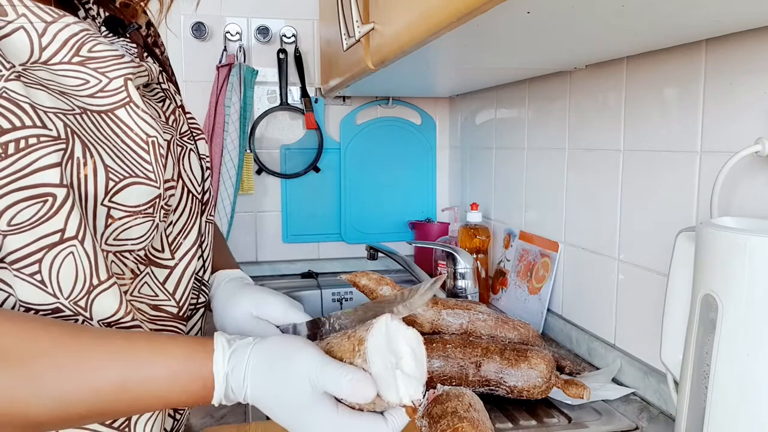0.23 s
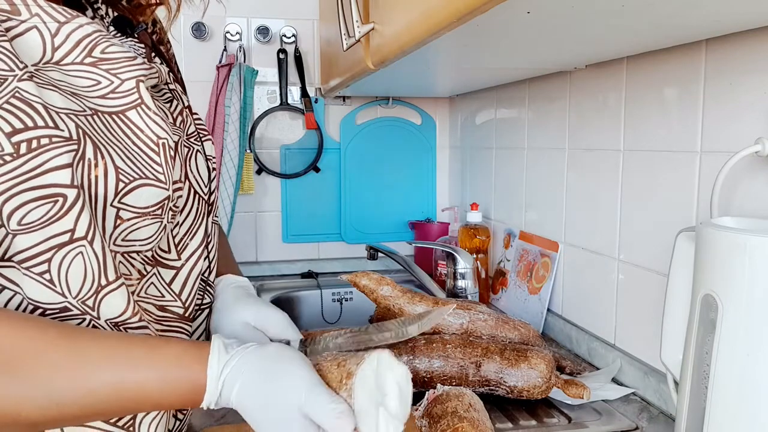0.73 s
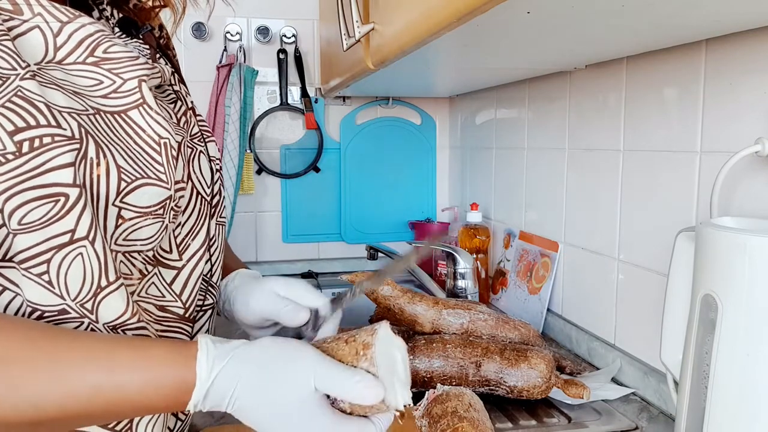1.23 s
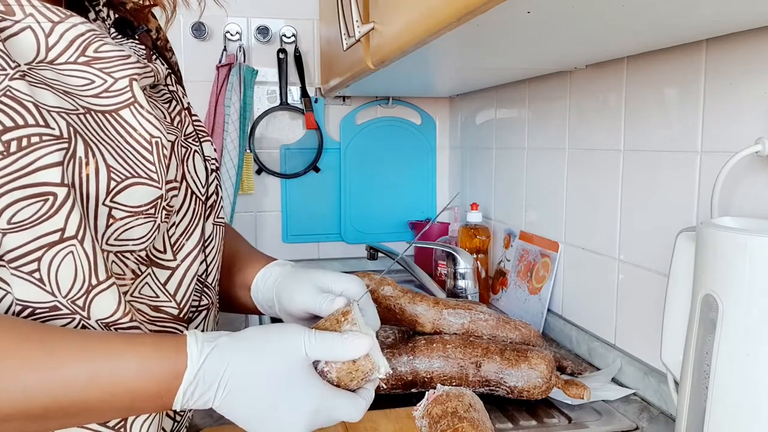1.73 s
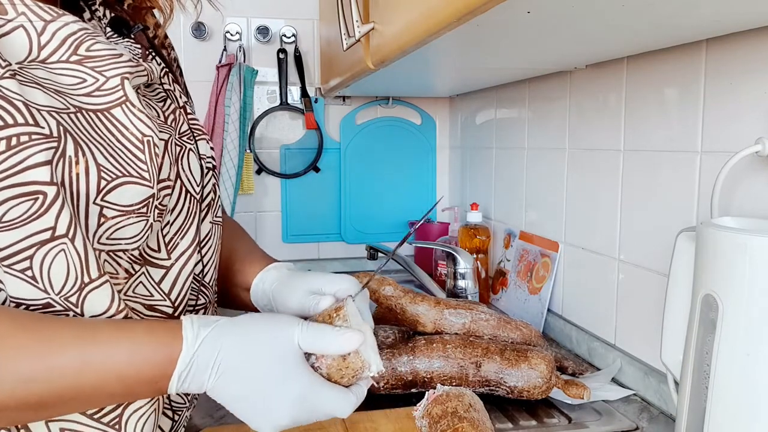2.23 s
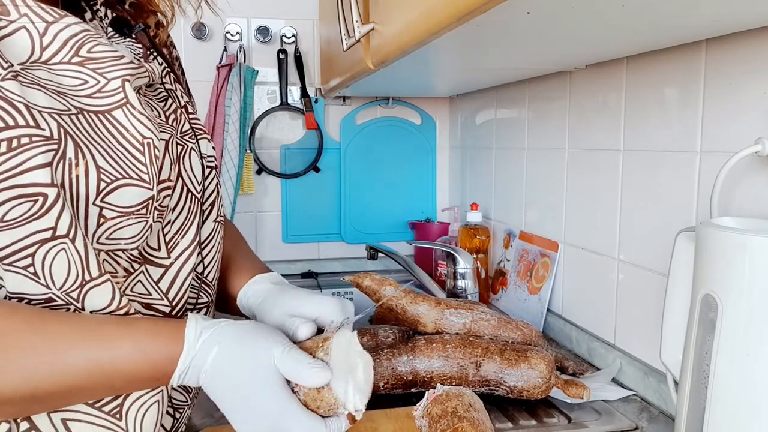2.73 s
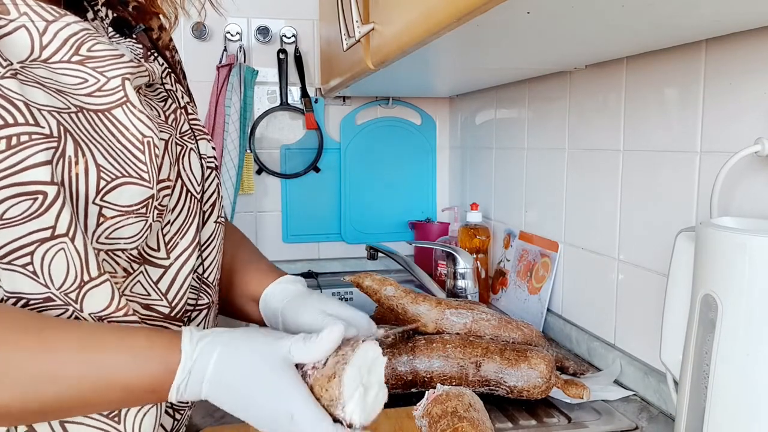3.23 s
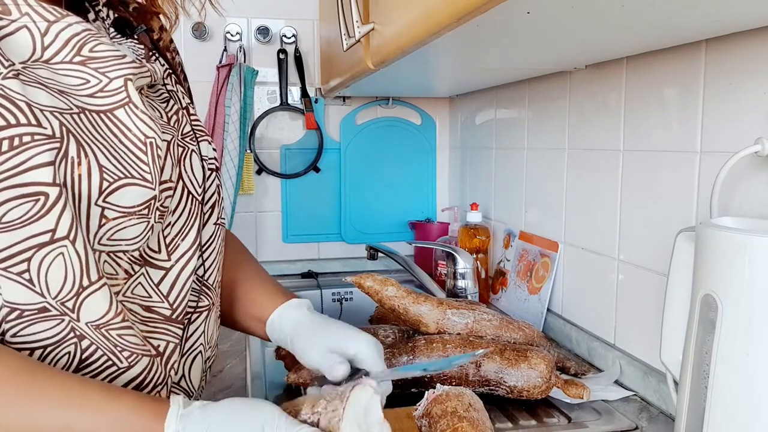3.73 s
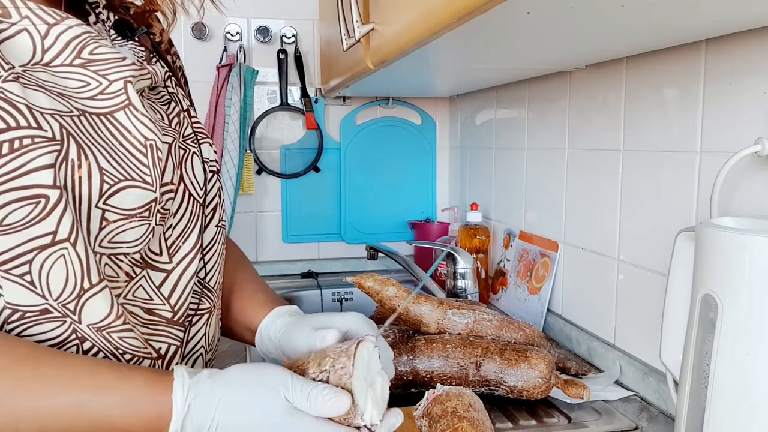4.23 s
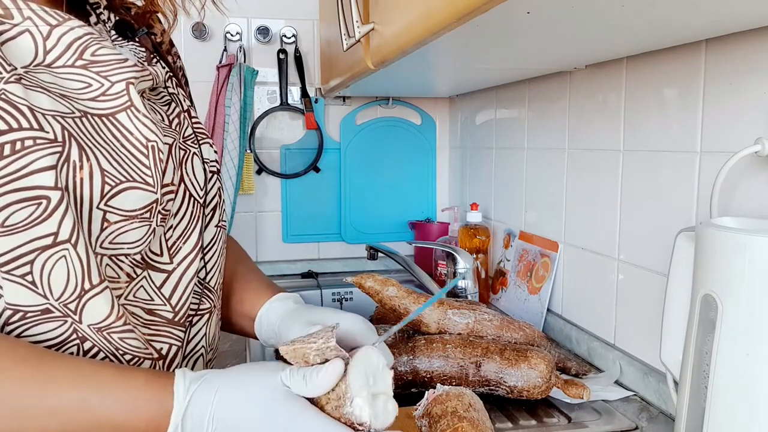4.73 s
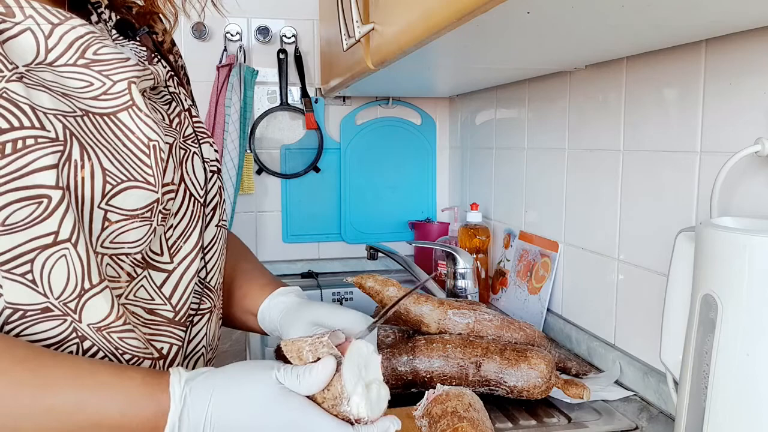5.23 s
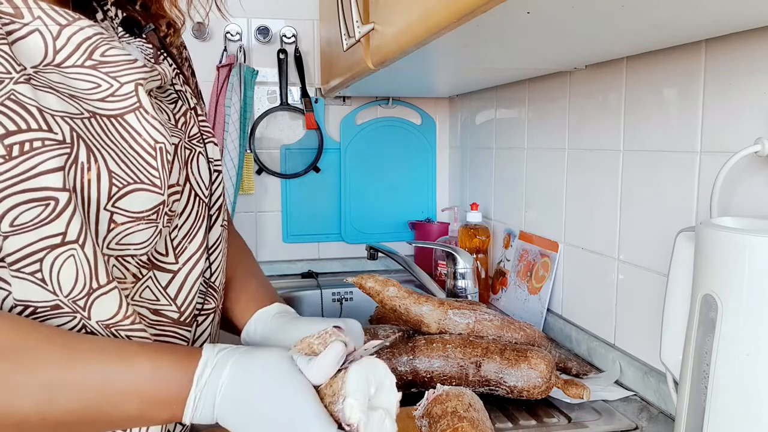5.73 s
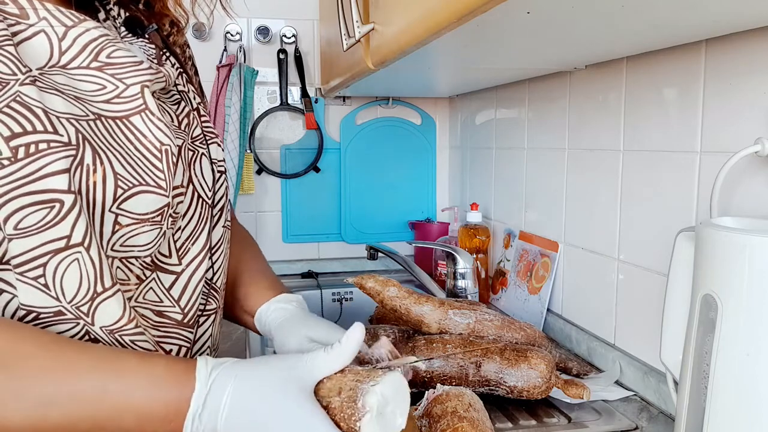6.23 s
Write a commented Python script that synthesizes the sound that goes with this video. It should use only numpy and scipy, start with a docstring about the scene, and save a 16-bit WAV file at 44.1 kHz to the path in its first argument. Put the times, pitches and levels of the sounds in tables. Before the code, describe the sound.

In a small tiled kitchen, a knife works under the tough peel of a cassava root close to the microphone. Faint scrapes grow into crisp, crackling rips as fibres snap. Midway the peel breaks loudly and the root thuds hollowly on a board. After a lull, more tearing follows, with a couple of lighter knocks. Faint traffic hums far behind.

```python
"""A small tiled kitchen: a gloved cook peels a cassava root over a counter.
The echo of an earlier knock dies away; traffic rumbles far off; gloves rub on the root.
The blade slides under the tough peel, which tears in rips, each a shower of snapping fibres.
The root knocks hollowly as the peel breaks, then thuds on the board: ringing modes and dull noise.
Tiles and cupboards reflect the peeling and the knocks."""
import sys
import numpy as np
from scipy import signal
from scipy.fft import rfft, irfft, next_fast_len
from scipy.io import wavfile

SR = 44100
rng = np.random.default_rng(int(sys.argv[2]) if len(sys.argv) > 2 else 0)


def wav_out(sig):
    """Save sig, one row per channel (or a flat mono array), as 16-bit PCM at SR to the path in sys.argv[1]."""
    wavfile.write(sys.argv[1], SR, np.round(np.clip(np.atleast_2d(sig).T, -1, 1) * 32767).astype(np.int16))


N = 286209

# Noise spectra. Each row: frequency in Hz, relative density in dB.
ECHO_COLOUR = [(350, -20), (600, -12.5), (746, -17), (1060, -4), (1340, 1), (1620, -8.5), (2130, -5.5),
               (2950, -13), (5740, -20), (7640, -28), (15500, -44)]
AIR_COLOUR = [(20, -22), (36, 3.5), (55, 3.5), (85, -1), (110, 2.5), (170, -7), (450, -11), (1200, -13),
              (2000, -21.5), (2600, -44), (3600, -39.5), (5200, -33.5), (9000, -36), (16000, -46)]
GLOVE_COLOUR = [(120, -16), (200, -5), (450, -6), (680, -2), (1000, -2.5), (2500, -37)]
# Passing traffic. Each row: time in seconds, engine level in dB, tyre level in dB.
TRAFFIC_LEVELS = [(0.0, -74, -66), (0.3, -79, -82), (0.6, -84, -67), (1.01, -78, -65), (1.43, -70, -74),
                  (1.9, -63, -78), (2.24, -75, -64), (2.55, -62, -64), (2.84, -64, -60), (3.31, -67, -62),
                  (3.7, -60, -60), (4.15, -74, -65), (4.41, -59, -60), (4.79, -55, -65), (5.02, -56, -59),
                  (5.3, -65, -61), (5.7, -61, -57), (5.9, -57, -59), (6.27, -50, -59), (6.49, -56, -54)]
# Engine partials; tyre noise as the room colours it. Each row: centre in Hz, width in Hz, gain in dB.
ENGINE_PARTIALS = [(68.46, 2.35, 2.5), (203.3, 3, -11), (316.4, 1.73, -8)]
TYRE_PEAKS = [(694, 46, 1), (807, 81, -2.5), (1130, 79, 1.5), (1323, 72, -7)]
# Glove rub. Each row: time in seconds, level in dB.
GLOVE_LEVELS = [(0.2, -80), (0.4, -78), (0.74, -59), (1.01, -67), (1.28, -68), (1.66, -54), (1.92, -67),
                (2.07, -72), (2.63, -68), (3.21, -58), (3.41, -61), (3.86, -59), (4.2, -64), (5.09, -58),
                (6.0, -58), (6.49, -55)]
# Blade pushes. Each row: peak time in seconds, swell and fade in seconds per 20 dB, peel drive in dB,
# then thick bark, skin and dust in dB re peel.
PUSHES = [(0.77, .28, .36, -63, 1, -13, -18), (1.03, .08, .3, -70, 1, -6, -6),
          (1.245, .08, .11, -68, -4, -5, -7), (1.54, .3, .12, -73, -6, -6, -3),
          (1.66, .3, .26, -72, 4, -14, -16), (2.267, .04, .04, -45, -3, -3, -5),
          (2.31, .06, .07, -60, 2, -1, -3), (2.41, .12, .12, -69, -12, -1, -2),
          (2.55, .05, .4, -52, -11, -5, -14), (2.63, .1, .25, -52, -3, -11, -7),
          (2.79, .13, .1, -44, -14, -11, -9), (2.808, .03, .05, -45, 3, 1, 1),
          (2.925, .04, .075, -52, -3, -3, 2), (3.12, .14, .32, -62, -5, -12, -9),
          (3.305, .03, .06, -43, -6, -3, -5), (3.35, .07, .11, -37, -2, -9, -6),
          (3.42, .04, .12, -55, 9, -3, -11), (3.48, .05, .03, -58, 0, -7, -8),
          (3.56, .03, .18, -62, 8, -9, -20), (3.63, .04, .04, -66, 5, 3, 3),
          (3.75, .3, .35, -80, -2, -8, -8), (4.35, .14, .1, -65, -3, -11, -15),
          (4.97, .18, .1, -70, -2, -14, -13), (5.09, .055, .075, -56, 5, -5, -1),
          (5.305, .03, .03, -66, -8, 5, 12), (5.335, .03, .05, -49, -3, -3, -6),
          (5.375, .05, .05, -48, -14, -14, -10), (5.47, .02, .04, -43, -1, 4, -2),
          (5.51, .12, .1, -53, -7, -5, -4), (5.567, .045, .07, -45, -1, -1, 1),
          (5.65, .1, .15, -63, -5, -9, -10), (5.79, .09, .11, -62, -6, 6, 1),
          (5.86, .1, .32, -64, -6, -12, -8), (6.13, .06, .1, -65, -4, -7, -1),
          (6.19, .04, .06, -57, -8, -8, -5), (6.245, .05, .13, -53, 1, -2, -4),
          (6.385, .1, .12, -49, 0, -7, -7), (6.467, .04, .03, -40, -10, -6, 1)]
# Sudden rips. Each row: start in seconds, peel drive in dB, then thick bark, skin and dust
# in dB re peel, T60 in seconds.
RIPS = [(0.988, -74, -10, 8, 12, .03), (1.0444, -61, 10, -8, -8, .018), (1.478, -78, -10, 4, 14, .04),
        (1.5274, -63, 0, -8, 2, .04), (2.1965, -55, -15, -6, -20, .04), (2.2243, -53, -9, -11, -24, .035),
        (2.2405, -45, -5, -11, -25, .03), (2.2595, -43, 0, -9, -10, .04), (2.3024, -48, -12, -18, -11, .04),
        (2.4548, -51, -13, -10, -13, .04), (2.5204, -49, -18, 1, -20, .03), (2.538, -54, -10, -6, -16, .03),
        (2.5778, -53, -12, -9, -20, .035), (2.591, -43, -7, -6, -18, .025),
        (2.7053, -56, -14, -12, -18, .035), (2.801, -34, -7, -4, -6, .045), (2.9117, -42, -5, -3, 0, .04),
        (2.9336, -46, -18, 0, -6, .04), (3.0873, -49, -24, -6, -20, .04), (3.275, -40, -8, -8, -8, .03),
        (3.289, -33, -11, -10, -18, .055), (3.3245, -30, -8, -22, -18, .02),
        (3.3314, -37, -8, -20, -18, .02), (3.3414, -33, -4, -24, -13, .03),
        (3.3595, -24, -2, -26, -20, .022), (3.372, -29, -7, -20, -14, .02),
        (3.4231, -35, -12, -22, -26, .018), (3.4745, -47, -8, -17, -16, .04),
        (3.5237, -44, 5, -28, -20, .04), (3.6287, -50, -7, -7, -5, .03), (4.3096, -57, -16, -17, -24, .035),
        (4.3765, -58, -12, -15, -20, .03), (5.088, -57, 1, -8, -3, .03), (5.3118, -50, -22, -1, -5, .035),
        (5.3353, -37, -24, -20, -16, .03), (5.362, -41, -24, -19, -17, .045), (5.463, -39, -9, 6, 1, .045),
        (5.5522, -45, -10, 4, 6, .035), (5.5603, -37, -12, 4, 0, .035), (5.5724, -41, 2, -3, -3, .035),
        (5.941, -56, -6, -8, -3, .03), (5.998, -68, -12, 6, 0, .025), (6.107, -53, -14, -12, 3, .035),
        (6.1813, -47, -2, -14, -14, .043), (6.222, -55, 6, -10, -6, .035), (6.3485, -46, -18, -10, -3, .03),
        (6.3746, -51, 5, -11, -12, .035), (6.3833, -39, -4, -8, -10, .06), (6.4368, -45, -8, -8, -8, .035),
        (6.4601, -38, -1, 0, 4, .045)]
# Fibre resonances, one list per size: peel, thick bark, skin, dust.
# Each row: centre in Hz, width in Hz, gain in dB.
FIBRE_PEAKS = [
    [(3920, 720, -7.5), (4570, 530, 0.5), (5226, 640, 3.5), (5900, 83, -6)],
    [(1150, 920, -4), (2030, 1000, -4.5), (2554, 410, -1.5), (3080, 400, -2)],
    [(7180, 1540, 1), (7840, 460, 4.5), (8170, 480, -7.5), (8600, 1900, -8)],
    [(10360, 3900, -4), (12430, 2800, 0), (14900, 2500, -1)],
]
# Passband per fibre size. Each row: low edge in Hz, high edge in Hz.
FIBRE_BANDS_HZ = [(2950, 6500), (676, 3200), (6000, 9800), (8600, 22000)]
# Gain per fibre size in dB.
FIBRE_GAINS_DB = [7.4, 7.74, 6.2, 4]
# Hollow knocks of the root as the peel breaks, then thuds on the board.
# Each row: start in seconds, level in dB, weight in dB, sharpness in dB.
KNOCKS = [(3.353, -35, -30, 1), (3.373, -38, -23, 9), (3.422, -35, -25, 2), (3.514, -26.5, 3, -6),
          (3.553, -9.5, -24, -12), (3.561, -17, -8.5, -5), (3.575, -14.5, -6, -34), (3.628, -29, -20, -13),
          (5.575, -37, -22, -4.5), (6.396, -24.5, -6, 1), (6.446, -30, -16, -2)]
# Modes rung by each knock. Each row: frequency in Hz, gain in dB, free T60 in seconds.
KNOCK_MODES = [(62, -9, 0.6), (115.2, 3.5, 0.54), (248, -11.5, 0.29), (338.4, -14.5, 0.51), (375, -5, 0.11),
               (426.3, -8, 0.3), (495, -15, 0.28), (574, -29.5, 0.087), (668, 10.5, 0.064),
               (740, -25.5, 0.41), (760, -1, 0.11), (950, -16, 0.17), (1067, 6, 0.12), (1249, -21, 0.29)]

TIME_S = np.arange(N) / SR


def from_db(db):
    """Decibels to gain."""
    return 10 ** (np.asarray(db) / 20)


def unit_rms(x):
    """Scale to rms 1."""
    return x / np.sqrt(np.mean(x ** 2) + 1e-20)


def level_curves(rows):
    """Rows of time and levels to one curve per level, sample by sample."""
    times_s, *columns = np.transpose(rows)
    return [np.interp(TIME_S, times_s, column) for column in columns]


def butterworth(x, order, edges_hz, kind):
    """Causal Butterworth filter."""
    return signal.sosfilt(signal.butter(order, edges_hz, kind, fs=SR, output="sos"), x)


def drift(rate_hz):
    """Slow random wander, rms about 1."""
    hop, settle = 40, 2000
    r = np.exp(-2 * np.pi * rate_hz * hop / SR)
    slow = signal.lfilter([1], [1, -2 * r, r * r], rng.standard_normal(N // hop + settle + 2))[settle:]
    return np.interp(np.arange(N) / hop, np.arange(len(slow)), unit_rms(slow))


def coloured_noise(colour, flicker_db):
    """Shaped noise with a flickering level, rms 1."""
    size = next_fast_len(N)
    hz, db = np.transpose(colour)
    bins_hz = np.maximum(np.arange(size // 2 + 1) * SR / size, 1)
    gains = from_db(np.interp(np.log(bins_hz), np.log(hz), db))
    noise = irfft(rfft(rng.standard_normal(size)) * gains, size)[:N]
    return unit_rms(noise * from_db(flicker_db * drift(rate_hz=9.8)))


def resonate(x, peaks):
    """Parallel two-pole resonators."""
    out = 0
    for hz, width_hz, db in peaks:
        r = np.exp(-np.pi * abs(width_hz) / SR)
        poles = [1, -2 * r * np.cos(2 * np.pi * hz / SR), r * r]
        out = out + from_db(db) * signal.lfilter([(1 - r * r) / 2, 0, (r * r - 1) / 2], poles, x)
    return out


def knock_echo(start_db=-34.5, t60_s=0.32):
    """Diffuse tail of an earlier knock: decaying noise."""
    return from_db(start_db - 60 * TIME_S / t60_s) * coloured_noise(ECHO_COLOUR, flicker_db=1)


def room_air(level_db=-57):
    """Still air of the room: faint, low noise."""
    return from_db(level_db) * coloured_noise(AIR_COLOUR, flicker_db=0.5)


def traffic():
    """Low engine partials and tyre hiss swell as vehicles pass."""
    engine_db, tyre_db = level_curves(TRAFFIC_LEVELS)
    engine = unit_rms(resonate(rng.standard_normal(N), ENGINE_PARTIALS))
    tyres = unit_rms(resonate(rng.standard_normal(N), TYRE_PEAKS))
    return from_db(engine_db) * engine + from_db(tyre_db) * tyres


def gloves():
    """Gloves handle the root: a dull rub."""
    level_db, = level_curves(GLOVE_LEVELS)
    return from_db(level_db) * coloured_noise(GLOVE_COLOUR, flicker_db=3.0)


def fibre_snaps(rate_per_s, spread_db):
    """Fibres snap at random, a few much harder than the rest; rms 1."""
    strengths = from_db(spread_db * np.minimum(rng.exponential(1, N), 5))
    signs = rng.choice([-1, 1], N)
    return unit_rms(strengths * signs * (rng.random(N) < rate_per_s / SR))


def peel(rise_share=0.07, first_snap_db=13, usual_rip_s=0.035):
    """Blade pushes and sudden rips drive one shower of snaps into four sizes of fibre."""
    power, first_snaps = np.zeros((4, N)), np.zeros((4, N))
    for peak_s, swell_s, fade_s, db, *sizes_db in PUSHES:
        envelope = from_db(-20 * np.maximum((peak_s - TIME_S) / swell_s, (TIME_S - peak_s) / fade_s))
        power += np.outer(from_db(db + np.array([0, *sizes_db])), envelope) ** 2
    power *= from_db(2 * drift(rate_hz=60)) ** 2  # 2 dB flutter
    t = np.arange(SR // 4) / SR
    for start_s, db, *sizes_db, t60_s in RIPS:
        i, rise_s = round(start_s * SR), rise_share * t60_s
        gains = from_db(db + np.array([0, *sizes_db]))
        envelope = np.minimum(t / rise_s, 1) * from_db(-60 * np.maximum(t - rise_s, 0) / t60_s)
        power[:, i:i + len(t)] += np.outer(gains, envelope)[:, :N - i] ** 2
        # One strong fibre gives way first; louder in a shorter rip.
        first_snaps[:, i] = gains * from_db(first_snap_db) * usual_rip_s / t60_s
    drives = np.sqrt(power) * fibre_snaps(rate_per_s=8000, spread_db=3.7) + first_snaps
    out = np.zeros(N)
    for drive, peaks, band_hz, db in zip(drives, FIBRE_PEAKS, FIBRE_BANDS_HZ, FIBRE_GAINS_DB):
        out += from_db(db) * butterworth(resonate(drive, peaks), 2, band_hz, "band")
    return out


def knock_ring(heavy_below_hz=190, sharp_above_hz=560, soft_contact_hz=2230, trim_db=-4, scatter_db=2):
    """Each knock rings hand-damped modes; heavy blows feed the low ones, sharp blows the high."""
    hand_t60_share, high_t60_share = 0.41, 0.38
    out, t = np.zeros(N), np.arange(SR) / SR
    for start_s, knock_db, weight_db, sharpness_db in KNOCKS:
        i = round(start_s * SR)
        for hz, mode_db, free_t60_s in KNOCK_MODES:
            scatter, polarity = rng.standard_normal(2)
            is_low, is_high = hz < heavy_below_hz, hz > sharp_above_hz
            blow_db = knock_db + trim_db + weight_db * is_low + sharpness_db * is_high
            gain = np.sign(polarity) * from_db(blow_db + mode_db + scatter_db * scatter)
            t60_s = free_t60_s * hand_t60_share * (high_t60_share if is_high else 1)
            ring = np.sin(2 * np.pi * hz * t) * from_db(-60 * t / t60_s)
            out[i:i + SR] += gain * ring[:N - i]
    return butterworth(out, 2, soft_contact_hz, "low")


def knock_thud(re_knock_db=-26, t60_s=0.27, band_hz=(150, 620)):
    """The dull, noisy thud of each knock, dying quickly."""
    envelope, t = np.zeros(N), np.arange(SR // 2) / SR
    for start_s, knock_db, *_ in KNOCKS:
        i = round(start_s * SR)
        envelope[i:i + len(t)] += from_db(knock_db + re_knock_db - 60 * t / t60_s)[:N - i]
    return envelope * unit_rms(butterworth(rng.standard_normal(N), 2, band_hz, "band"))


def kitchen_reverb(x, gain_db=-8.5, low_t60_s=0.31, treble_t60_s=0.15, crossover_hz=3030):
    """Dense reflections off tiles and cupboards; the treble dies first."""
    t = np.arange(SR // 2) / SR
    white = rng.standard_normal(len(t))
    low = butterworth(white, 1, crossover_hz, "low")
    response = low * from_db(-60 * t / low_t60_s) + (white - low) * from_db(-60 * t / treble_t60_s)
    response *= np.clip(t / 0.0064 - 0.3, 0, 1)  # travel to the first walls
    response /= np.sqrt(np.sum(response ** 2))
    return from_db(gain_db) * signal.fftconvolve(x, response)[:N]


def scene():
    """Peeling and knocks with their reverb, plus gloves and background; mono."""
    near = peel() + knock_ring() + knock_thud()
    soft_noises = gloves() + knock_echo() + room_air()
    return (near + kitchen_reverb(near) + soft_noises + traffic())[None]


def record(dry):
    """The microphone drops the deepest bass; the top is cut."""
    low_hz, high_hz = 43.2, 15800
    top_cut = signal.ellip(12, 0.5, 70, high_hz, fs=SR, output="sos")
    return signal.sosfilt(top_cut, butterworth(dry, 3, low_hz, "high"))


dry = scene()
out = record(dry)
wav_out(out)
```